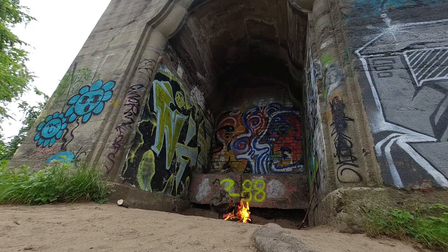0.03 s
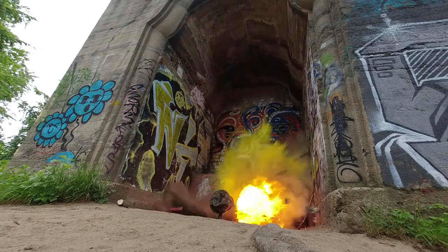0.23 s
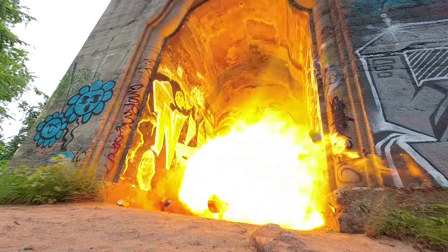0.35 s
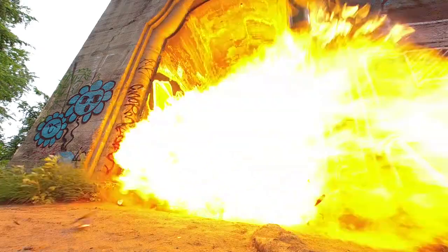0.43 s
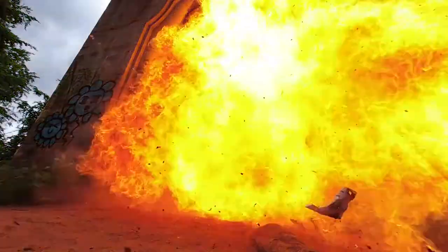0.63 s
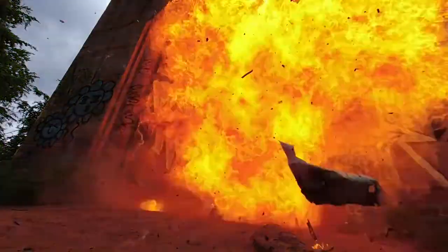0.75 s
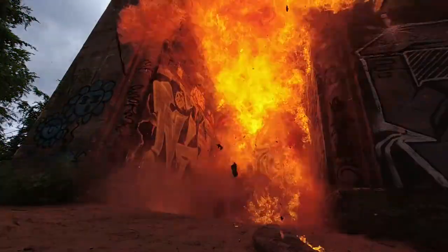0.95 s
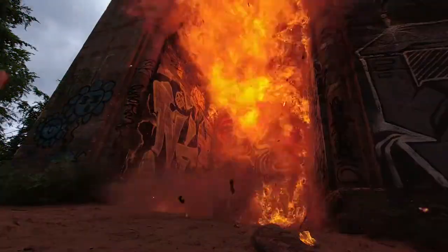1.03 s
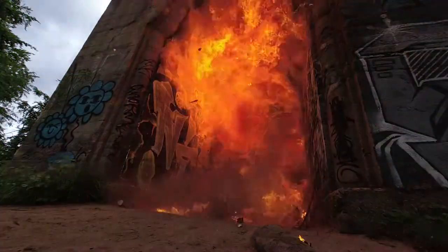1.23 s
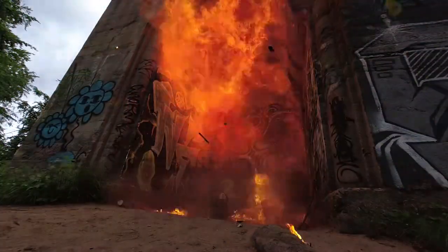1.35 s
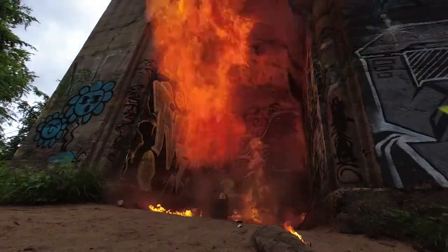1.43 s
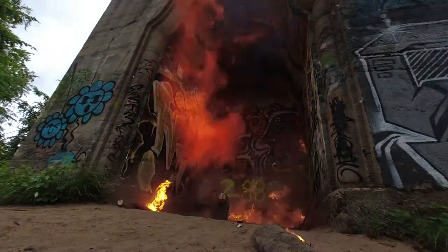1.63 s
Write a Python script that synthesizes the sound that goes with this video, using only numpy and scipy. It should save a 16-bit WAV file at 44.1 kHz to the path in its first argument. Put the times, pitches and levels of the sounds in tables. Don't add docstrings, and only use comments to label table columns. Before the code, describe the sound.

A gas cartridge explodes with a sharp metallic crack, roaring hiss and overloaded bass, then debris clatters.

```python
import sys
import numpy as np
from scipy import signal
from scipy.io import wavfile

SR = 44100
rng = np.random.default_rng(int(sys.argv[2]) if len(sys.argv) > 2 else 0)


def volts(x):
    e = np.asarray(x, float) / 20
    return 10 ** e


def waveform_to_disk(signal):
    frames = np.transpose(np.atleast_2d(signal))
    scaled = np.clip(frames, -1, 1) * 32767
    samples = np.round(scaled).astype(np.int16)
    wavfile.write(sys.argv[1], SR, samples)


N = 74970
BURST_S = 0.2346


def rms_one(x):
    return x / np.sqrt(np.mean(x ** 2) + 1e-20)


def at_hz(points, hz):
    table = np.array(points)
    return np.interp(np.log(hz), np.log(table[:, 0]), table[:, 1])


def in_time(rows):
    s, *columns = np.transpose(rows)
    return [np.interp(np.arange(N) / SR, s, c) for c in columns]


def drift(rate_hz):
    r = np.exp(-2 * np.pi * rate_hz * 40 / SR)
    steps = rng.standard_normal(N // 40 + 2002)
    slow = rms_one(signal.lfilter([1], [1, -2 * r, r * r], steps)[2000:])
    return np.interp(np.arange(N) / 40, np.arange(len(slow)), slow)


def passed(x, order, hz, kind):
    return signal.sosfilt(signal.butter(order, hz, kind, fs=SR, output="sos"), x)


def ring(clicks, hz, t60):
    r = volts(-60 / (t60 * SR))
    w = 2 * np.pi * hz / SR
    return signal.lfilter([0, np.sin(w)], [1, -2 * r * np.cos(w), r * r], clicks + 1e-18)


def click(s):
    return 1.0 * (np.arange(N) == int(s * SR))


def dying(s, t60):
    t = np.maximum(np.arange(N) / SR - s, 0)
    touch_s = 0.0013
    return np.minimum(t / touch_s, 1) * volts(-60 * t / t60)


def squash(x, top, knee):
    return x / (1 + np.abs(x / top) ** knee) ** (1 / knee)


def panned(db):
    return volts([[db / 2], [-db / 2]])


def grit_burst(grit, s, hz, t60, octaves):
    edges = np.minimum(hz * 2.0 ** np.array([-octaves / 2, octaves / 2]), 0.45 * SR)
    band = passed(grit * dying(s, t60) + 1e-18, 2, edges, "band")
    return band * np.sqrt(SR / 2 / (edges[1] - edges[0]))


def hiss():
    return rng.standard_normal((2, 2, N))


# f/Hz, likeness/(-1 to 1)
LIKENESS = [(30, 0.84), (125, 0.99), (300, 1), (1400, 0.76), (2600, 0.03), (4000, 0.45), (8000, -.2),
            (14000, -.15)]


def banded(white, colour, patchy_db, tilt_db=0):
    out, power, together = 0, 0, drift(7.5)
    edges = 18 * 2 ** np.arange(0, 10.1, 0.5)
    run_in = 6000
    for k, (low, high) in enumerate(zip(edges, edges[1:])):
        looped = np.tile(white[k % 2], 2)[:, N - run_in:]
        mid, side = passed(looped, 2, [low, high], "band")[:, run_in:]
        hz = np.sqrt(low * high)
        alike = np.clip(at_hz(LIKENESS, hz), -1, 1)
        gain = volts(at_hz(colour, hz) - 30 * (hz < colour[0][0] / 1.5))
        power += gain ** 2 * (high - low) * 2 / SR
        flicker_db = patchy_db * (together + drift(27))
        gain = gain * volts(flicker_db + tilt_db * np.log2(hz / 600))
        out = out + gain * (np.sqrt(1 + alike) * mid + np.sqrt(1 - alike) * side * [[1], [-1]])
    return out / np.sqrt(power)


# f/Hz, level per Hz/dB
AIR_COLOUR = [(25, 1.5), (50, 4.5), (90, -8), (300, -18), (1000, -27.5), (2000, -40), (6000, -42),
              (16000, -70)]


def air():
    drone = np.sin(2 * np.pi * 48 * np.arange(N) / SR)
    return volts(-52.5) * banded(hiss(), AIR_COLOUR, patchy_db=-0.5) + volts(-51) * drone


# t/s, level/dB, brightness/(dB per octave)
FLAMES = [(.235, -29.5, 1), (.3, -18, 1), (.5, -27, -2), (.56, -31, -1), (.62, -32, -0.5), (.75, -37.5, 0),
          (.9, -42, 0.5), (1.0, -42.5, 0), (1.1, -40.5, 0), (1.2, -42.5, 0.5), (1.3, -43.5, 0.5),
          (1.42, -42.5, -0.5), (1.5, -37, 1), (1.55, -40, 0.5), (1.61, -45.5, 0.5), (1.7, -47.5, -1)]
# f/Hz, level per Hz/dB
FLAME_COLOUR = [(30, -5.5), (140, -3), (250, -11.5), (620, -15.5), (870, -28.5), (1250, -28.5), (4000, -50),
                (14000, -55)]


def flames():
    db, tilt_db = in_time(FLAMES)
    lit = np.arange(N) > BURST_S * SR
    return volts(db) * lit * banded(hiss(), FLAME_COLOUR, patchy_db=1.52, tilt_db=tilt_db)


# t/s, level/dB, rise/s, fall/s
PUFFS = [
    (0.739, -51, 0.022, 0.037),
    (0.994, -59.5, 0.016, 0.011),
    (1.103, -55.5, 0.011, 0.0071),
    (1.189, -56.5, .015, 0.028),
    (1.28, -59.5, 0.027, .03),
    (1.421, -50, 0.014, .025),
    (1.518, -56, 0.016, 0.022),
]
# f/Hz, level per Hz/dB
PUFF_COLOUR = [(300, 6.5), (900, 6.5), (1500, -3), (2600, -8.5), (4000, -28), (14000, -48)]


def puffs():
    t = np.arange(N) / SR
    shape = 0
    for s, db, rise, fall in PUFFS:
        swell, fade = np.exp(-((t - s) / rise) ** 2), np.exp(-np.abs(t - s) / fall)
        shape = shape + volts(db) * np.where(t < s, swell, fade)
    return shape * banded(hiss(), PUFF_COLOUR, patchy_db=4.0)


# f/Hz, level per Hz/dB
ASH_COLOUR = [(3000, -5.5), (6500, -20.5), (8500, 7), (10000, -14), (13000, 5), (15500, -1)]


def ash():
    start_s, rise_s, fall_s, grains_per_s = 0.653, 0.086, 0.2, 4100
    t = np.maximum(np.arange(N) / SR - start_s, 0)
    falls = rng.random((2, 2, N)) < grains_per_s / SR
    weight_db = 3.5 * np.minimum(rng.exponential(1, (2, 2, N)), 3)
    grains = falls * volts(weight_db) * np.sign(hiss())
    rise = np.minimum(t / rise_s + 0.42 * (t > 0), 1)
    shape = rise * np.exp(-np.maximum(t - rise_s, 0) / fall_s)
    return volts(-55) * shape * banded(rms_one(grains), ASH_COLOUR, patchy_db=1.2)


# t/s, level/dB, f/Hz, fade by 60 dB/s, left-
# right/dB
CHIPS = [(.7215, -46, 14900, .015, -5), (0.7303, -42, 13500, 0.017, -3), (0.7296, -48, 8500, .012, -2),
         (.734, -42, 3480, 0.05, 3), (.7595, -48.5, 8200, .02, 0), (.8034, -49.5, 9110, .03, -3),
         (.804, -50, 12000, .03, 0), (.834, -48, 7900, 0.017, 3), (.9075, -50, 13200, .015, -2),
         (0.9366, -47.5, 11500, .012, 4), (0.978, -62, 2670, .2, 3), (.9999, -51, 14800, 0.025, 1),
         (1.103, -54, 2540, .05, 0), (1.188, -58, 2540, .05, -5), (1.2511, -55, 2540, 0.035, 0),
         (1.3367, -59, 2520, .03, 2), (1.5775, -60, 11800, .02, 0), (1.6065, -61, 13000, 0.014, 0),
         (1.507, -41, 980, 0.19, 0)]


def chips():
    out = np.zeros((2, N))
    grit = rng.standard_normal(N) + 0.33 * rng.standard_normal((2, N))
    for s, db, hz, t60, pan_db in CHIPS:
        out += volts(db) * grit_burst(grit, s, hz, t60, octaves=0.32) * panned(pan_db)
    return out


# t/s, level/dB, middle f/Hz, fade by 60 dB/s, left-right/dB
SCRAPS = [(.7166, -38, 11000, 0.025, 4), (0.887, -43.5, 4300, 0.021, -2), (.8867, -37, 12500, 0.021, -6),
          (0.902, -41, 12400, 0.032, -2), (0.9373, -36.5, 4300, 0.0083, 1),
          (0.9783, -41, 11600, 0.018, 1.5), (1.072, -39.5, 5660, 0.014, 4),
          (1.0705, -41.5, 13500, 0.016, -3), (1.4301, -35.5, 3400, 0.023, -1), (1.435, -54, 4560, .07, -3),
          (1.51, -41.5, 3500, 0.043, 1), (1.511, -43, 9900, 0.038, 2), (1.5737, -53, 2720, 0.056, -1),
          (1.607, -54, 4000, 0.022, 0), (1.661, -56.5, 3030, 0.041, 0)]


def scraps():
    out, grit = np.zeros((2, N)), rng.standard_normal((2, N))
    for s, db, hz, t60, pan_db in SCRAPS:
        scrape = grit_burst(grit, s, hz, t60, octaves=1)
        tick = volts(-21) * np.diff(grit[::-1] * dying(s, 0.0089), prepend=0)
        out += volts(db) * (scrape + tick) * panned(pan_db)
    return out


# f/Hz, level/dB, fade by 60 dB/s
PIECE = [(470, -10, 0.066), (705, -5, 0.054), (982, 3, 0.035), (1277, -2, 0.043), (1550, -7.5, 0.024),
         (1860, -9, 0.02), (2250, -4, 0.02), (2680, -8, 0.016), (3240, -3.5, 0.014), (4260, -14, .012),
         (4930, -17, 0.01)]


def piece():
    land_s = 1.4886
    out = volts(-23) * ring(click(land_s + 0.0083) - 0.5 * click(land_s - 0.024), 106, 0.069)
    contact = dying(land_s, 0.03) + volts(-20.0) * dying(land_s + 0.019, 0.03)
    for hz, db, t60 in PIECE:
        knock = rng.choice([-1, 1]) * click(land_s + rng.uniform(0, 0.00301))
        grit = rng.standard_normal(N) + 0.24 * rng.standard_normal((2, N))
        out = out + volts(-26.5 + db) * ring(knock + 0.089 * contact * grit, hz, t60)
    grit = rng.standard_normal(N) + 0.3 * rng.standard_normal((2, N))
    return out + volts(-17) * passed(grit * contact, 1, [700, 3000], "band")


# t/s, level/dB, f/Hz, fade by 60 dB/s, push direction/(1 or -1)
SURGES = [(0.273, -10.5, 50, 0.81, -1), (.273, -3, 158, .06, -1), (0.3023, 1, 147, 0.09, 1),
          (.348, -3, 146, 0.18, 1), (0.365, 5, 21, 0.097, 1), (.398, 4, 67, 0.1, -1),
          (.4205, 7, 49, 0.066, 1), (0.442, 14.5, 30, 0.11, 1), (0.461, -1.5, 104, 0.06, 1),
          (0.4723, 3.5, 116.5, 0.12, 1), (0.4914, -2, 118, 0.11, 1), (0.504, 10, 29, 0.077, -1),
          (0.52, 9, 16.5, 0.23, 1), (.536, -2, 50, 0.058, 1), (0.548, 0.5, 25.4, 0.4, -1),
          (.592, -5.5, 79, 0.062, 1), (0.718, -44, 49, 0.18, -1), (0.899, -31, 19, 0.16, 1),
          (0.991, -33.5, 70, 0.12, -1), (1.082, -26.5, 31, 0.12, -1), (1.593, -25, 88, 0.13, 1),
          (1.602, -36, 81, 0.21, 1)]


def surges():
    out = 0
    for s, db, hz, t60, way in SURGES:
        out = out + np.sign(way) * volts(db) * ring(click(s), hz, t60)
    swing = squash(passed(out, 2, 420, "low"), 0.95, 1.85)
    lag = int(0.0002 * SR)
    return np.array([np.roll(swing, lag), swing])


# t/s, level/dB, brightness/(dB per octave)
JET = [
    (.235, -15, -1.5),
    (.246, -25, 0),
    (.258, -11.5, -0.5),
    (.29, -10.5, -1.5),
    (.36, -20, 0.3),
    (.385, -25, 0.14),
    (.44, -29.5, -0.23),
    (.475, -31.5, -1.5),
    (.8, -49.5, -2),
]
# f/Hz, level per Hz/dB
JET_COLOUR = [(100, -22), (170, -3.5), (300, -11), (620, -9.5), (1600, -19.5), (5000, -25.5), (8500, -34),
              (13000, -31)]
# t/s, peak level/dB
SPITS = [
    (0.2334, -12.5),
    (0.2573, -14),
    (0.2686, -6),
    (0.2824, -6),
    (0.496, -28),
]


def jet():
    db, tilt_db = in_time(JET)
    t = np.arange(N) / SR
    swelling = t < BURST_S
    swell_db = -31 - 654 * (BURST_S - t) - 3000 * np.maximum(0.1975 + 0.01 - t, 0)
    db = np.where(swelling, swell_db, db - 60 * np.maximum(t - 0.8, 0))
    tilt_db = np.where(swelling, 0.6, np.clip(tilt_db, -5, 1))
    crackle = volts(0.84 * np.repeat(rng.standard_normal(N // 60 + 1), 60)[:N])
    spits = sum(volts(peak_db - 7.5) * dying(s, 0.02) for s, peak_db in SPITS)
    noise = banded(rms_one(hiss() * crackle), JET_COLOUR, patchy_db=1.14, tilt_db=tilt_db)
    roar = (volts(db) + spits) * noise
    high = passed(roar, 2, 364, "high")
    built = np.clip((t - 0.2576) / 0.025, 0, 1)
    return built * roar + (1 - built) * high


# f/Hz, level/dB, fade by 60 dB/s
SHELL = [(636.4, -5.5, 0.06), (541, -7.5, 0.041), (1026, -30, 0.39), (1550, -32, 0.044), (2480, -56, 0.052),
         (3300, -45, 0.031), (790, -23, 0.033)]
# t/s, level/dB
SPLITS = [
    (.2506, -5),
    (.2554, -3),
    (.2618, -9.5),
    (.2698, -5),
    (.2778, -15),
]


def shell():
    shock_s, tears_per_s, tear_fall_s = 0.0020, 250, 0.046
    t = np.arange(N) / SR - BURST_S
    n_wave = (1 - 2 * t / shock_s) * (t >= 0) * (t < shock_s)
    shock = signal.lfilter([0.04], [1, -1.6, 0.64], n_wave)
    tear_level = volts(-9.5) * np.clip(t / 0.013, 0, 1) * np.exp(-np.maximum(t, 0) / tear_fall_s)
    tears = (rng.random(N) < tears_per_s / SR) * tear_level
    blows = click(BURST_S) + sum(volts(db) * click(s) for s, db in SPLITS)
    out = volts(-5) * shock
    for hz, db, t60 in SHELL:
        out = out + volts(db) * ring(blows + tears * rng.standard_normal(N), hz, t60)
    return out


def wall_echo(x):
    lags = (0.0073 * SR * np.array([1, 1.23])).astype(int)
    return volts(-12) * np.array([np.roll(side, lag) for side, lag in zip(x, lags)])


def pinned_gain():
    blocked_s, freed_s, blocked_db = 0.507, 0.533, -22
    db, = in_time([(blocked_s - 0.004, 0), (blocked_s + 0.0095, blocked_db),
                   (freed_s - 0.004, blocked_db), (freed_s + 0.01, 0)])
    return volts(db)


def scene():
    hard = shell() + scraps() + piece()
    fine = hard + wall_echo(hard) + air() + flames() + puffs() + ash() + chips() + jet()
    return squash(fine, 0.73, 3.0) * pinned_gain() + surges()


def low_pass(x):
    return signal.sosfilt(signal.butter(12, 16540, fs=SR, output="sos"), x)


def record(dry):
    x = dry - 0.51 * signal.lfilter(*signal.iirpeak(6800, 5.1, fs=SR), dry)
    x = x + 0.51 * signal.lfilter(*signal.iirpeak(13000, 12.6, fs=SR), x)
    x = squash(passed(x, 1, 4, "high"), top=1.0, knee=6.0)
    mix = signal.sosfilt(signal.ellip(12, 0.5, 90, 15670, fs=SR, output="sos"), x)
    return low_pass(mix)


dry = scene()
out = record(dry)
waveform_to_disk(out)
```